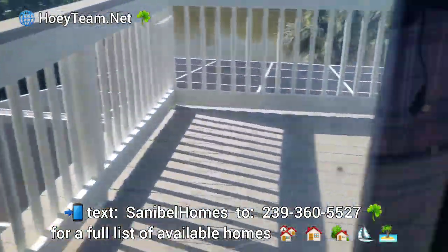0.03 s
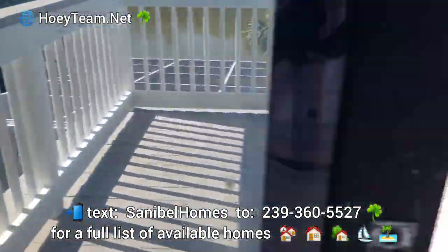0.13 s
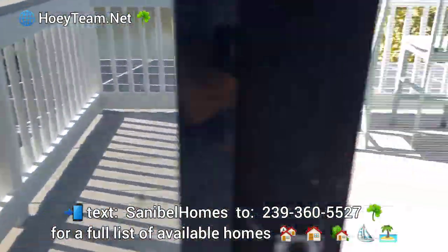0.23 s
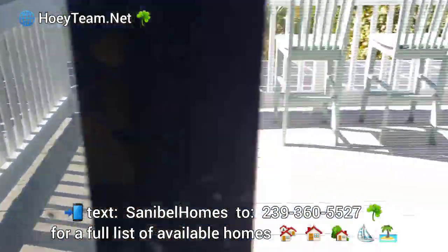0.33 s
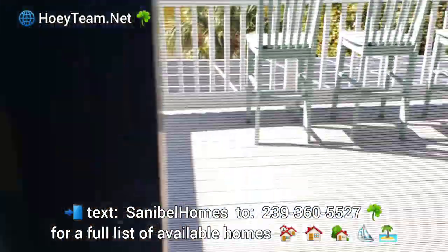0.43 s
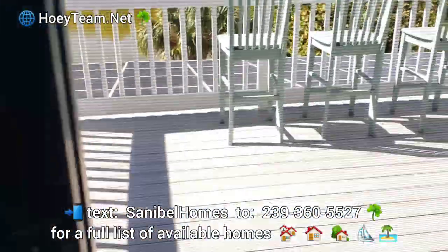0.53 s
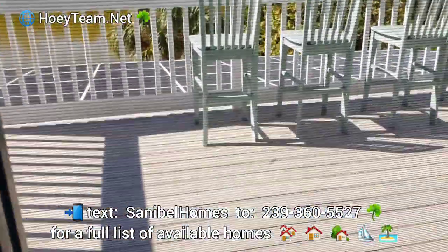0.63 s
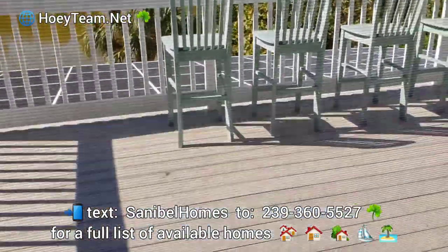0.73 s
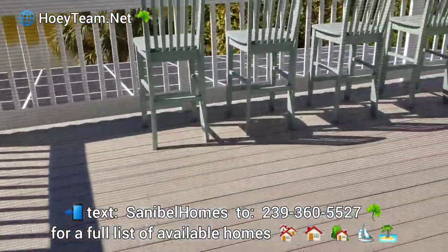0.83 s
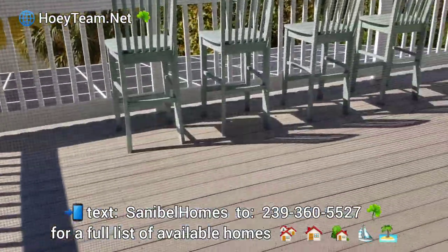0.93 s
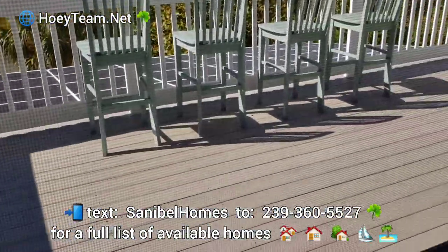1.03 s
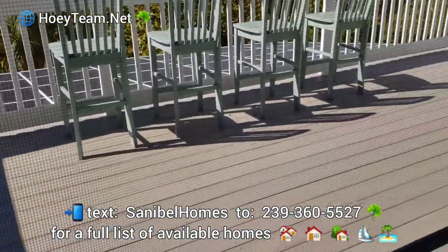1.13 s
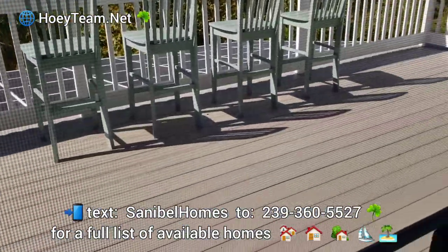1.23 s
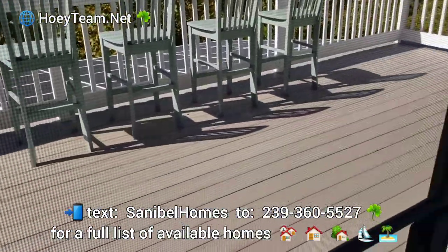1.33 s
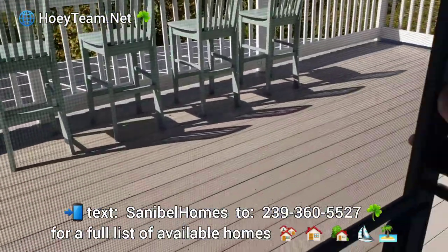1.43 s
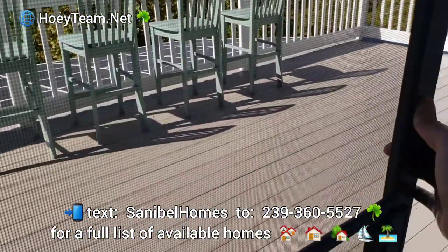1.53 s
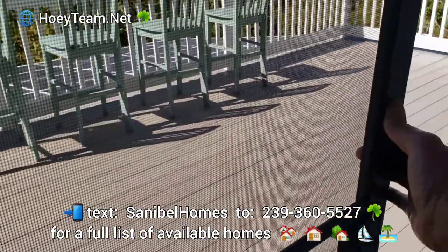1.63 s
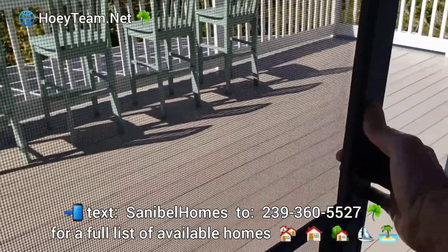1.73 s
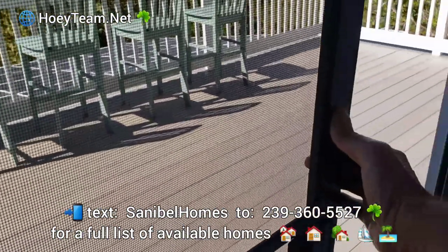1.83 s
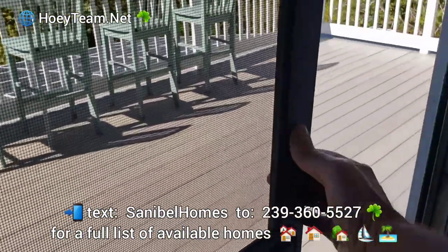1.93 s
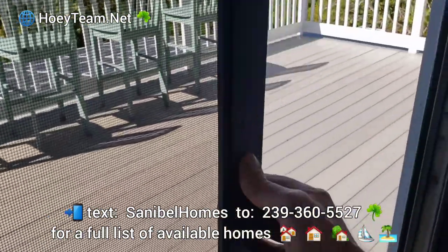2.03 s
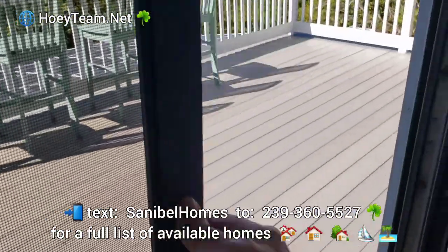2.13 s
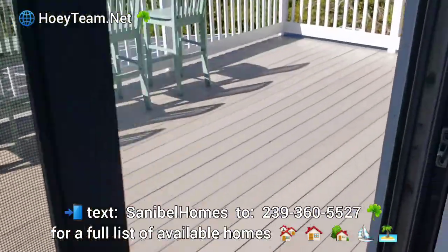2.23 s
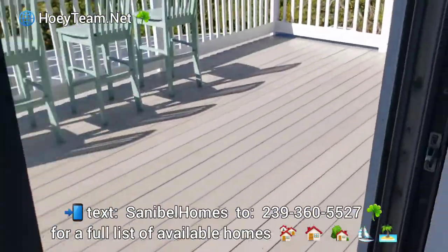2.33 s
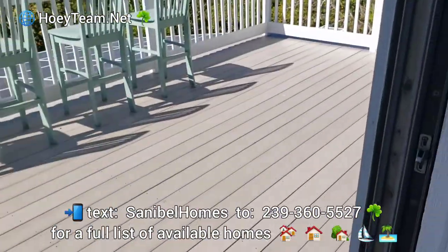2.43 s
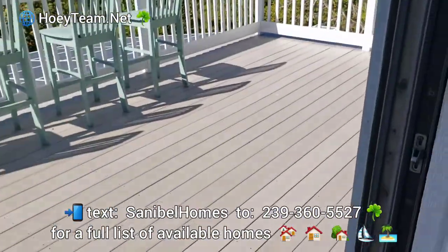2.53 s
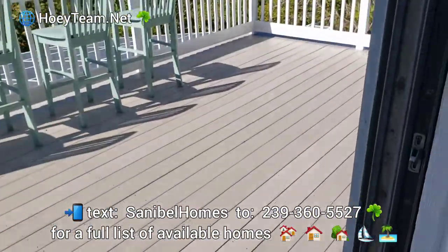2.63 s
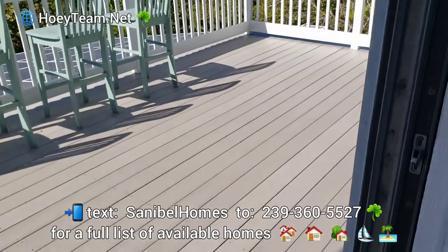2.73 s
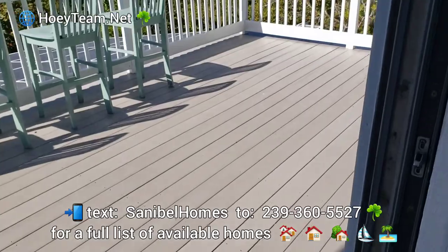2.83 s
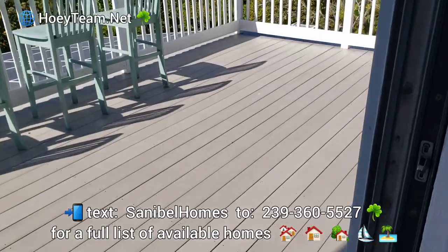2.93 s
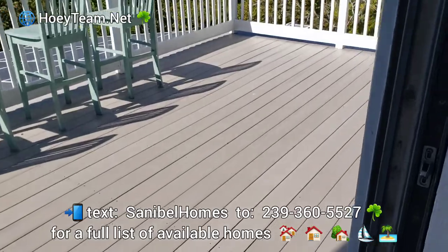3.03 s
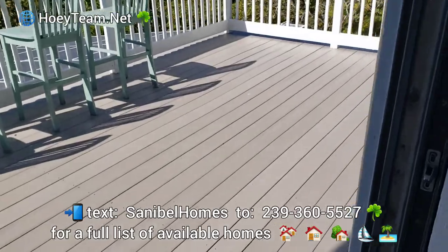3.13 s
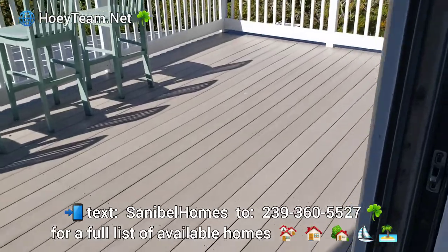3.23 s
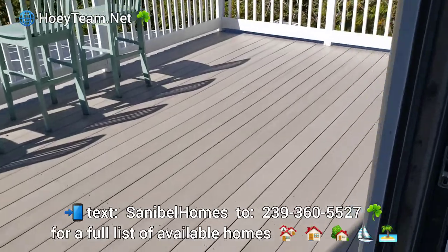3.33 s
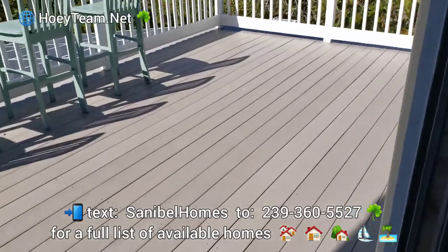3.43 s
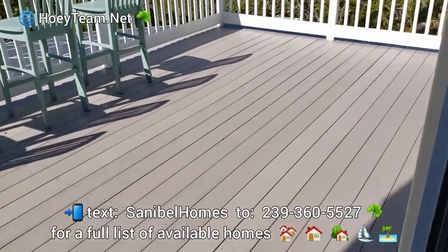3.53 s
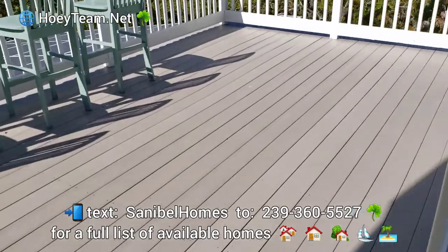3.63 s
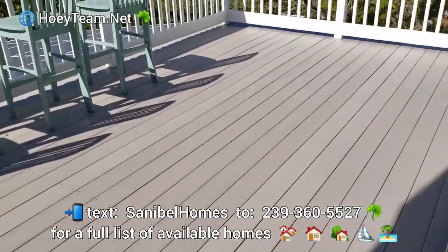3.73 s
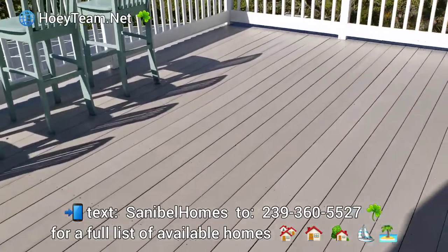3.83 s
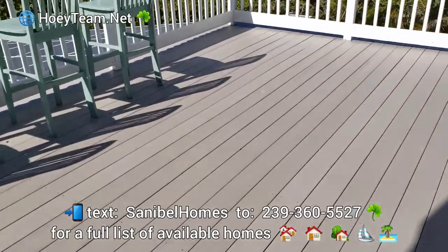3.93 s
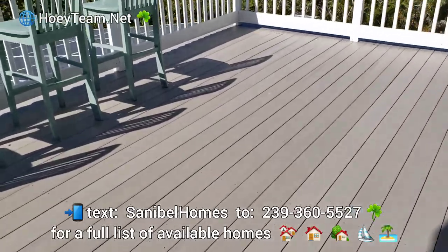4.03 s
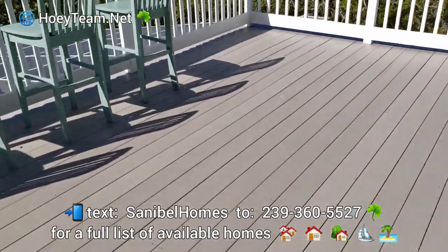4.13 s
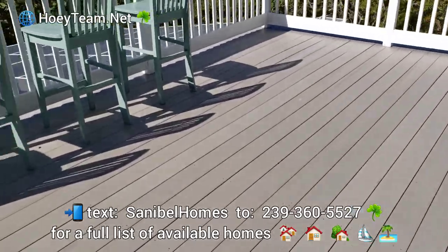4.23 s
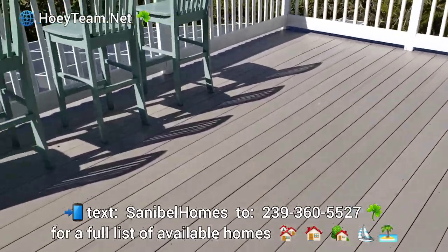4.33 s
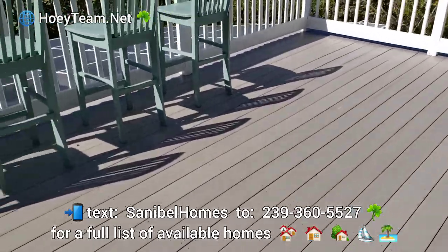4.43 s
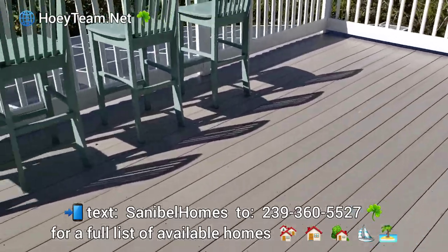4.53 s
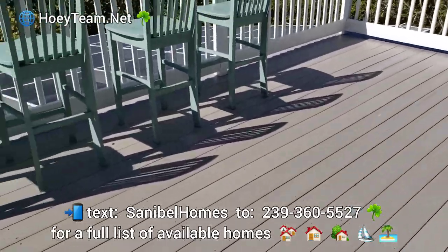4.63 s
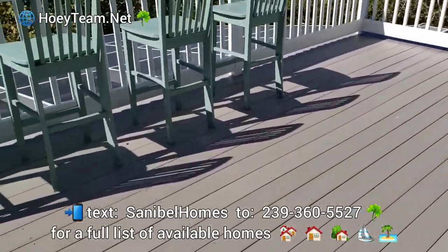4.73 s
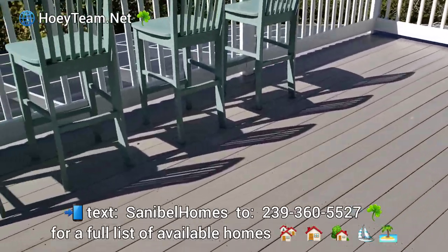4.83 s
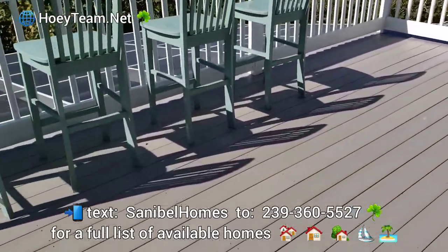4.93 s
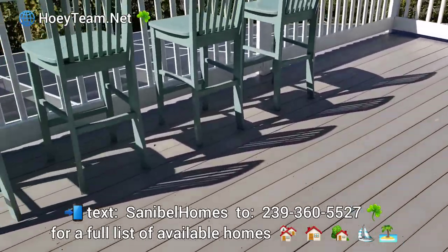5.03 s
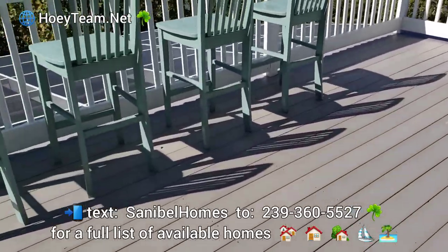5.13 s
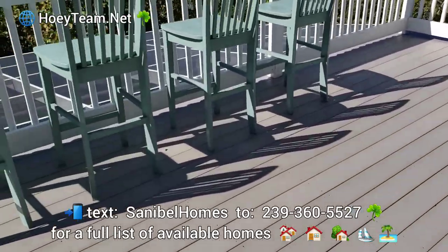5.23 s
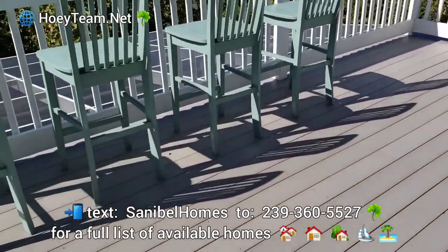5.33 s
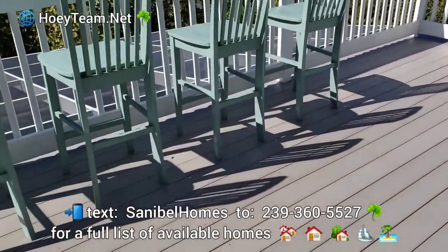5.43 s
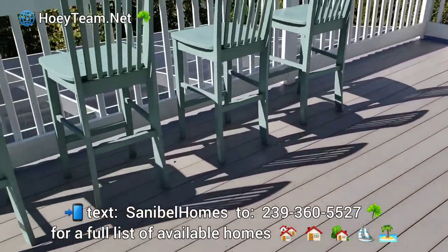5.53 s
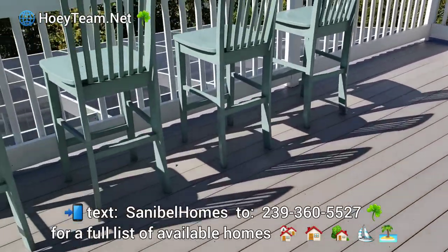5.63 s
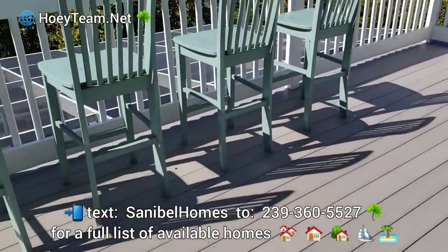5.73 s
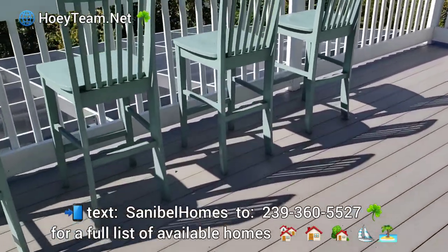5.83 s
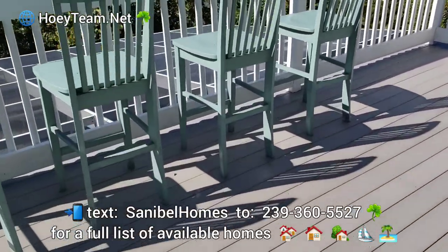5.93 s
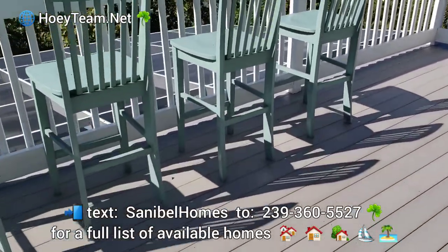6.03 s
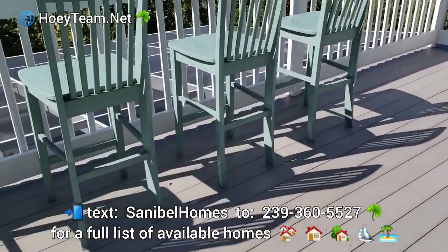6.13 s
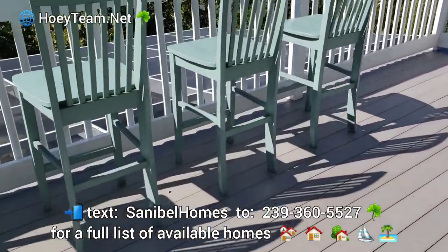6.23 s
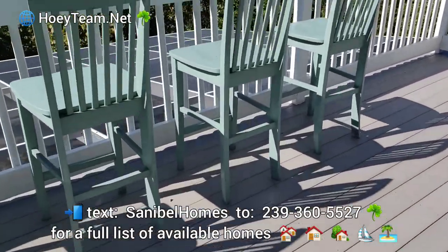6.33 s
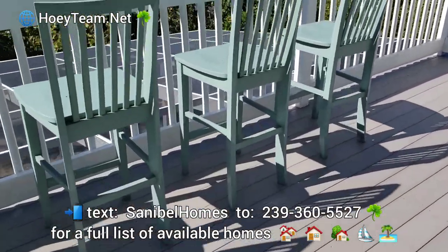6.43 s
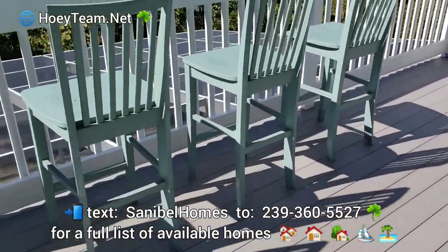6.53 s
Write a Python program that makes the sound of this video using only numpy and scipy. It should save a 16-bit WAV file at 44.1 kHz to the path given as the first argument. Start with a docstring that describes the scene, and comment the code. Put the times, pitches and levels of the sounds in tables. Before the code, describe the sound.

Close, dry scuffs and fingers rubbing a handle lead into a heavy glass door rumbling along its metal track. A lighter, brighter screen door follows, rattling and ending with small metallic chirps. Soft, hollow footfalls step onto the deck, then one loud, sharp knock rings briefly with short room reflections. A few more steps follow over faint low rumble and distant air. Handheld stereo microphone, close to the doorway.

```python
"""Sliding glass door and screen.

A glass door, then its screen, roll along a gritty aluminium track: dense random impacts through body colours.
Cloth, fingers and brush seals rub as slip noise; the rail rings briefly where a wheel catches.
Footfalls push on a hollow deck's modes; a frame knocks sharply as ringing modes, and the room answers.
Low rumble of place, lingering pane and trodden deck lies below, with faint distant air: both shaped noise."""
import sys
import numpy as np
from scipy import signal
from scipy.fft import rfft, irfft, next_fast_len
from scipy.io import wavfile
from scipy.ndimage import map_coordinates

SR = 44100
rng = np.random.default_rng(int(sys.argv[2]) if len(sys.argv) > 2 else 0)


def dump(signal):
    """Clip the signal to [-1, 1] and save it as 16-bit WAV at the path in sys.argv[1]."""
    limited = np.clip(np.atleast_2d(signal).T, -1, 1)
    pcm = np.round(limited * 32767).astype(np.int16)
    wavfile.write(sys.argv[1], SR, pcm)


N = 289957

# likeness of the two channels: freq_hz, correlation
CHANNEL_CORRELATION = [(100, 0.95), (280, 0.84), (550, 0.81), (1000, 0), (3000, 0.0064), (15000, 0.13)]


def amp(db):
    """Decibels to gain."""
    return 10 ** (np.asarray(db) / 20)


def unit(x):
    """Scale to rms 1."""
    return x / np.sqrt(np.mean(x ** 2) + 1e-20)


def along(points, hz):
    """Join (Hz, value) points on a log frequency axis."""
    f, v = np.transpose(points)
    return np.interp(np.log(hz + 1), np.log(np.sort(f) + 1), v)


def curves(rows):
    """One level per sample for each dB column; -120 dB outside the rows."""
    s, *cols = np.transpose(rows)
    return [np.interp(np.arange(N) / SR, s, c, left=-120, right=-120) for c in cols]


def wobble(knots_per_s):
    """Smooth random curve through normally distributed knots."""
    knots = rng.standard_normal(N // 20)
    return map_coordinates(knots, [np.arange(N) * knots_per_s / SR], mode="wrap")


def fade(t, t60):
    """Exponential decay, 60 dB in t60."""
    return np.exp(-np.log(1000) * t / t60)


def filtered(x, response):
    """Multiply the spectrum of x by a response of frequency."""
    size = x.shape[-1]
    m = next_fast_len(size + SR // 4)
    return irfft(rfft(x, m) * response(np.fft.rfftfreq(m, 1 / SR)), m)[..., :size]


def channel_angle(hz):
    """Angle whose cosine is the left-right correlation."""
    return np.arccos(np.clip(along(CHANNEL_CORRELATION, hz), -1, 1))


def spread(pair, response):
    """Colour two unrelated signals and mix them to stereo of rms 1: bass shared, treble apart."""
    def mid_side_response(hz):
        turn = channel_angle(hz) / 2
        return response(hz) * np.array([np.cos(turn), np.sin(turn)])

    mid, side = filtered(pair, mid_side_response)
    return unit(np.array([mid + side, mid - side]))


def noise(colour, size):
    """Stereo noise with a given spectrum, rms 1."""
    return spread(rng.standard_normal((2, size)), lambda hz: amp(along(colour, hz)))


def add(track, start_s, sound):
    """Mix a sound into the track."""
    part = track[:, round(start_s * SR):][:, :sound.shape[-1]]
    part += sound[..., :part.shape[-1]]


def tail(colour):
    """One second of room answer; the treble dies first."""
    # freq_hz, t60_s
    room_decay = [(80, 1), (250, 0.46), (1000, 0.36), (3000, 0.35), (8000, 0.27), (15000, 0.21)]
    hz, t, z = signal.stft(noise(colour, size=SR), SR, nperseg=256)
    decaying = z * fade(t, along(room_decay, hz)[:, None])
    return signal.istft(decaying, SR, nperseg=256)[1][:, :SR]


def bumps(rate_per_s, ring_t60_s, tick):
    """Random tiny impacts: each is a bare tick and a short diffuse ring of its own."""
    sizes = amp(4.5 * np.clip(rng.standard_normal(N), -2, 2))
    hits = (rng.random(N) < rate_per_s / SR) * sizes / np.sqrt(rate_per_s)
    keep = fade(1 / SR, ring_t60_s) ** 2  # share of the ringing energy left after one sample
    power = signal.lfilter([1 - keep], [1, -keep], hits ** 2)
    return np.sqrt(power + (tick * hits) ** 2) * rng.standard_normal((2, N))


def rasp(length_s, centre_hz):
    """A sudden short noise burst with a faint slower tail."""
    # multiple of the centre, level_db (per Hz)
    burst_shape = [(.1, -19), (.33, -15.5), (.65, -4.5), (1, 7.5), (1.45, -3), (3, -19), (8, -40)]
    t = np.arange(SR // 5) / SR
    onset = 1 - np.exp(-t / (.03 * length_s))
    decay = fade(t, 1.2 * length_s) + amp(-24) * fade(t, 6 * length_s)
    colour = [(centre_hz * k, level_db) for k, level_db in burst_shape]
    return amp(2.5) * onset * decay * noise(colour, size=len(t))


def outdoors():
    """Low rumble of place, lingering pane and trodden deck, with faint distant air, as wavering noise."""
    # time_s, level_db
    rumble_level = [(0, -57), (0.45, -63.5), (1.2, -48.5), (1.6, -55), (2.7, -52), (3.4, -57),
                    (3.95, -54.5), (4.3, -59), (5.2, -60), (5.85, -66.5), (6.3, -51), (6.6, -62)]
    # freq_hz, level_db (per Hz)
    rumble_colour = [(22, -29), (45, 4), (70, 4), (130, 1), (220, -3.5), (330, -13), (700, -46.5)]
    air_colour = [(150, 4.5), (350, 1.5), (700, 1), (1020, 1), (1350, -5.5), (2500, -10.5), (5000, -22),
                  (9000, -31)]
    air_db = -68
    low = noise(rumble_colour, size=N) * amp(curves(rumble_level)[0] + 1.2 * wobble(14))
    return low + noise(air_colour, size=N) * amp(air_db + 0.77 * wobble(4.5))


def scuffs():
    """Dry scuffs and small ticks close by, now and then."""
    # start_s, level_db, length_s, centre_hz
    scuff_events = [(0.034, -33.5, 0.057, 11900), (0.168, -29.5, 0.0091, 11400),
                    (0.202, -24.5, 0.018, 11400), (0.212, -27, 0.024, 11200), (0.25, -29.5, 0.023, 11800),
                    (0.352, -45.5, 0.024, 1140), (0.432, -28, 0.027, 10760), (0.489, -25.5, 0.025, 10400),
                    (0.7515, -24, 0.023, 10000), (0.815, -27, 0.038, 10000), (1.476, -65, 0.077, 4680),
                    (1.894, -32, 0.034, 8700), (2.057, -30, 0.038, 10400), (3.006, -47, 0.14, 1750),
                    (3.12, -52, 0.024, 9900), (3.88, -59.5, 0.064, 1160), (3.881, -57, .015, 10740),
                    (4.016, -69.5, 0.042, 4700), (4.878, -67, 0.034, 450), (4.949, -51, 0.04, 477),
                    (4.986, -55.5, 0.053, 700), (6.411, -55, .02, 7900), (6.456, -39.5, 0.006, 11470)]
    out = np.zeros((2, N))
    for start_s, level_db, length_s, centre_hz in scuff_events:
        add(out, start_s, amp(level_db) * rasp(length_s, centre_hz))
    return out


def creak(start_s, hz, level_db):
    """A loaded deck board gives one soft, short creak on two close modes."""
    out, t = np.zeros((2, N)), np.arange(SR // 4) / SR
    ring = np.sin(2 * np.pi * hz * t) + .5 * np.sin(2 * np.pi * 1.12 * hz * t)
    add(out, start_s, amp(level_db) * ring * (1 - np.exp(-t / .004)) * fade(t, 0.11))
    return out


def tread(push_hz):
    """One push on the boards rings mostly the deck modes near its own period."""
    # freq_hz, level_db, t60_s
    deck_modes = [(70.9, -7, 0.38), (96.7, 1.5, 0.076), (159.8, -5.5, 0.12), (214, -13, 0.13),
                  (298, -18.5, 0.21), (430, -22.5, 0.47)]
    t = np.arange(SR // 2) / SR
    push = np.sin(2 * np.pi * push_hz * t) * fade(t * push_hz, 5.8)  # decay counted in cycles
    boards = np.zeros(len(t))
    for hz, level_db, t60_s in deck_modes:
        coupling = 1 / (1 + np.log2(hz / push_hz) ** 2)
        boards += amp(level_db) * coupling * np.sin(2 * np.pi * hz * t) * fade(t, t60_s)
    onset = 1 - np.exp(-(t * push_hz / 0.59) ** 2)
    return onset * (amp(5.0) * push + boards)


def steps():
    """Each foot rolls from heel to ball in three ever slower pushes; a harder heel thuds and scrapes more."""
    # footfalls on sill and deck: start_s, heel_push_hz, heel_to_ball_s, heel_db, midfoot_db, ball_db
    footfalls = [(2.909, 199, .02, -36.5, -48, -50), (3, 207, 0.025, -35, -40, -27.5),
                 (3.684, 210, .039, -25, -30, -31.5), (3.796, 129.5, 0.026, -38.5, -53.5, -54),
                 (3.881, 174, 0.029, -39, -46, -53), (4.877, 140, 0.0275, -21.5, -28, -31.5),
                 (6.037, 235, .053, -23, -23, -23), (6.238, 195, 0.038, -37.5, -42, -35.5),
                 (6.424, 85, 0.027, -43, -58, -40)]
    # freq_hz, level_db (per Hz)
    sole_colour = [(40, -10), (90, 5.5), (250, -2.5), (450, -11.5), (900, -22), (2000, -42), (6000, -49.5)]
    ball_pitch = 0.56  # ball push frequency / heel push frequency
    thud_db, thud_rise_s = -15, 0.0053  # diffuse thud of the whole deck
    scrape_db, scrape_s, scrape_hz, hard_heel_hz = -28.5, 0.0756, 633, 219
    out, t = np.zeros((2, N)), np.arange(SR) / SR
    for start_s, heel_hz, roll_s, heel_db, midfoot_db, ball_db in footfalls:
        for part, level_db in [(0, heel_db), (.5, midfoot_db), (1, ball_db)]:
            add(out, start_s + part * roll_s, amp(level_db) * tread(heel_hz * ball_pitch ** part))
        hardness = heel_hz / hard_heel_hz
        thud = tail(sole_colour) * (1 - np.exp(-(t / thud_rise_s) ** 2))
        add(out, start_s, amp(heel_db + thud_db) * hardness * thud)
        add(out, start_s, amp(heel_db + scrape_db) * hardness ** 4 * rasp(scrape_s, scrape_hz))
    # keep the deepest bass out of the footfalls
    return signal.sosfilt(signal.butter(2, 52, "high", fs=SR, output="sos"), out)


def knock():
    """The frame hits its stop: quick hard contacts, the ring of frame and pane, then the room."""
    # frame landing, then latch rattle: start_s, level_db
    contacts = [(5.3058, -22.5), (5.3142, -33), (5.3197, -28.5)]
    # freq_hz, level_db, t60_s
    frame_modes = [(159.7, -35, 0.17), (219.4, -26.5, 0.2), (287, -33, .33), (380.4, -19, 0.25),
                   (380, -28, 0.12), (417, -37, 0.35), (506, -46, 0.55), (788, -44.5, 0.46),
                   (790, -53, 0.23), (920, -34, 0.15), (1050, -37, 0.18), (1193, -29, 0.13),
                   (1350, -58, 0.2), (1620, -39, 0.27), (2086, -34, 0.18), (2235, -29, 0.16),
                   (2670, -37, 0.15), (2670, -38, 0.18), (2990, -35, 0.15), (3380, -34, 0.18),
                   (3440, -42.5, 0.3), (4030, -46, 0.24), (5405, -38, 0.17)]
    # freq_hz, level_db (per Hz)
    knock_colour = [(30, -26), (60, -3.5), (130, -3), (300, 0), (450, 2), (600, -6), (1100, -5.5),
                    (1550, -12.5), (2700, -9.5), (3700, -15.5), (8000, -16), (12000, -13.5), (15800, -17)]
    out, t = np.zeros((2, N)), np.arange(SR) / SR
    for start_s, level_db in contacts:
        crack = noise(knock_colour, size=SR) * fade(t, 0.071) * amp(0.5)
        answer = amp(-5.5) * tail(knock_colour)
        add(out, start_s, amp(level_db) * (1 - np.exp(-t / 0.00024)) * (crack + answer))
    for hz, level_db, t60_s in frame_modes:
        apart = channel_angle(hz) * rng.choice([-.5, .5]) * np.array([[1], [-1]])
        ring = np.sin(2 * np.pi * hz * t + apart) * fade(t, t60_s)
        add(out, contacts[0][0], amp(level_db) * ring * (1 - np.exp(-t / 0.017)))
    u = t / 0.00056
    add(out, 5.308, -amp(-12.0) * (1 - u) * np.exp(-u))  # the pane's single hard push on the air
    return out


def slips(colour):
    """Fibres or skin catch and slip: dense tiny impacts with a fluttering level."""
    hiss = spread(bumps(3900, ring_t60_s=0.048, tick=0.067), lambda hz: amp(along(colour, hz)))
    return hiss * amp(wobble(35))


def rubbing(glass_speed_db, screen_speed_db, glass_seal_db, screen_seal_db):
    """Fibres of sleeve and brush seals slip in a fine hiss; fingers on the handle slide more dully."""
    # slow sleeve strokes: peak_s, level_db, rise_s, fall_s (e-folding times)
    strokes = [(0.09, -35, 0.053, 0.089), (0.23, -38.5, .03, .05), (0.47, -37, .04, .06),
               (0.771, -42, .06, .07), (1.33, -64.5, 0.13, 0.13), (1.43, -53.5, 0.023, 0.051),
               (1.515, -55, 0.025, 0.12), (2.85, -60.5, 0.026, .09), (3.07, -48.5, 0.032, 0.04),
               (3.31, -57.5, 0.1, 0.19), (3.722, -54, 0.033, .055), (5.1, -68, .15, 0.22),
               (5.549, -67, 0.17, 0.64), (6.36, -62.5, 0.19, .35)]
    # fingers on the handle: time_s, level_db
    grip_level = [(0, -60.5), (0.04, -54), (0.25, -54.5), (0.33, -56.5), (0.42, -55), (0.5, -70.5)]
    # freq_hz, level_db (per Hz)
    fibre_colour = [(1500, -29), (3200, -18), (5000, -14.5), (7500, -15), (9200, -4.5), (11500, -3),
                    (15500, -5)]
    grip_colour = [(60, -11), (150, -5), (215, 6), (310, -4), (650, -8.5), (850, -6.5), (1020, 5.5),
                   (1350, -14.5), (1900, -10), (3200, -17), (6000, -15), (10000, -36)]
    cloth_db = -75  # clothes never lie quite still
    seal_growth = 1  # dB per dB of speed
    t = np.arange(N) / SR
    power = amp(cloth_db) ** 2
    for peak_s, level_db, rise_s, fall_s in strokes:
        shape = np.exp(np.minimum((t - peak_s) / rise_s, (peak_s - t) / fall_s))
        power = power + (amp(level_db) * shape) ** 2
    for seal_db, speed_db in [(glass_seal_db, glass_speed_db), (screen_seal_db, screen_speed_db)]:
        power = power + amp(seal_db + seal_growth * speed_db) ** 2
    return np.sqrt(power) * slips(fibre_colour) + amp(curves(grip_level)[0]) * slips(grip_colour)


def chirps():
    """A wheel catches and the rail rings briefly: decaying sines, phase-shifted between channels."""
    # start_s, level_db (before a common lift), pitch_hz, t60_s
    catches = [(1.064, -40, 3560, 0.058), (1.922, -32, 4070, 0.038), (2.382, -30, 5580, 0.028),
               (2.4495, -22.5, 4200, 0.015), (2.4608, -10.5, 4100, 0.0081), (2.505, -36.5, 4510, 0.054)]
    out, t = np.zeros((2, N)), np.arange(SR // 8) / SR
    for start_s, level_db, pitch_hz, t60_s in catches:
        phase = 2 * np.pi * pitch_hz * t + np.array([[0], [.9]])
        onset = 1 - np.exp(-(t / 0.0014) ** 2)
        add(out, start_s, amp(level_db + 5) * np.sin(phase) * fade(t, t60_s) * onset)
    return out


def doorway(x):
    """Close reflections from glass, jamb and floor ripple the spectrum above 540 Hz."""
    t = np.arange(SR // 6) / SR
    echoes = filtered(rng.standard_normal((2, len(t))) * fade(t, .11), lambda hz: hz > 540)
    wet = signal.fftconvolve(x, echoes / np.linalg.norm(echoes[0]), axes=1)[:, :N]
    return x + .5 * wet


def door_speed(*pushes):
    """Speed in dB through a door's pushes, briefly lifted where wheels jolt over rail flaws."""
    # peak_s, lift_db
    jolts = [(0.492, 2.5), (0.876, 2), (1.007, 3.5), (1.691, 4.5), (1.898, 0.5), (2.095, 1), (2.46, 3.5),
             (2.926, 6.5), (3.012, 4.5)]
    jolt_width_s = 0.039
    t = np.arange(N) / SR
    speed_db = np.max([curves(push)[0] for push in pushes], axis=0)
    return speed_db + sum(lift_db / (1 + ((t - s) / jolt_width_s) ** 2) ** 2 for s, lift_db in jolts)


def roll(speed_db, colour, peaks, rumble_db, rattle_db, grit_db):
    """Wheels run over track bumps and sand: the faster they run, the denser, louder and brighter the impacts."""
    rumble_growth, grit_growth = 0.74, 1.028  # dB per dB of speed
    judder_db, judder_per_s = 0.13, 35
    density = .5 + amp(speed_db / 2)
    judder = judder_db * wobble(judder_per_s)  # uneven wheels shake all parts of the door together

    def body(hz):
        lift_db = sum(db / (1 + (2 * (hz - f) / width) ** 2) for f, width, db in peaks)
        return amp(along(colour, hz) + lift_db)

    def below(hz, edge_hz):
        return 1 / (1 + (hz / edge_hz) ** 8)

    def part(impacts, low_hz, high_hz):
        def band(hz):
            return body(hz) * np.sqrt(np.abs(below(hz, high_hz) - below(hz, low_hz)))
        return spread(impacts, band)

    pane = part(bumps(1100 * density, ring_t60_s=0.04, tick=0.31), 45, 300)
    frame = part(bumps(1100 * density, ring_t60_s=0.04, tick=.5), 300, 1500)
    sand = part(bumps(1300 * density, ring_t60_s=.024, tick=.3), 1500, SR)
    mix = pane * amp(rumble_db + rumble_growth * speed_db)
    mix += frame * amp(rattle_db + speed_db)
    mix += sand * amp(grit_db + grit_growth * speed_db)
    return amp(judder) * mix


def scene():
    """Both doors, the person, the low rumble and the open air."""
    # what each door radiates: freq_hz, level_db (per Hz)
    glass_colour = [(22, -22), (45, -4.5), (110, 1), (200, -0.5), (320, -9.5), (520, -11), (900, -11),
                    (1500, -18.5), (2500, -20.5), (3700, -23), (5500, -21.5), (7200, -30), (10000, -29),
                    (15000, -46)]
    screen_colour = [(22, -28.5), (45, -5.5), (110, 4.5), (170, 3), (320, -4.5), (650, -7), (950, -6.5),
                     (1400, -16), (2500, -13.5), (4500, -17.5), (7200, -25.5), (10000, -28.5), (15000, -37)]
    # panel and rail resonances: freq_hz, width_hz, lift_db
    glass_peaks = [(128.3, 25, 0.5), (233, 19, -2.5), (379, 29, 7.5), (500, 32, 13), (562, 66, 2.5),
                   (770, 60, 1), (1080, 140, 2.5), (2750, 290, 3.5), (5300, 820, 3)]
    screen_peaks = [(161, 4.7, 1.7), (267, 21, 4.8), (370, 16, 6.9), (510, 13, 3), (680, 50, 1.9),
                    (886, 140, 3.1), (983, 22, 1.6), (1448, 62, 7.1), (1710, 170, 6.1), (4100, 550, 2.3),
                    (5040, 1100, 5)]
    # glass pushed open and coasting to rest; screen following, then nudged on: time_s, speed_db (re full)
    glass_push = [(0.41, -31), (0.485, -14.5), (0.56, -8), (0.79, -1), (1.02, -3), (1.15, -11), (1.26, -32),
                  (1.4, -56)]
    screen_push = [(1.6, -37), (1.72, -17), (1.88, -4), (2.12, 1), (2.36, -3.5), (2.53, -8.5),
                   (2.62, -24.5), (2.79, -40)]
    screen_nudge = [(2.78, -36.5), (2.93, -21), (3.06, -19.5), (3.201, -42)]
    glass_speed_db, screen_speed_db = door_speed(glass_push), door_speed(screen_push, screen_nudge)
    glass = roll(glass_speed_db, glass_colour, glass_peaks, rumble_db=-34, rattle_db=-33.0, grit_db=-39)
    screen = roll(screen_speed_db, screen_colour, screen_peaks, rumble_db=-33.0, rattle_db=-30.5, grit_db=-36)
    fibres = rubbing(glass_speed_db, screen_speed_db, glass_seal_db=-44.5, screen_seal_db=-41)
    to_right = amp([[-.7], [.7]])  # the working arm is on the right
    doors = doorway(glass + fibres * to_right) + doorway(screen) + chirps()
    person = scuffs() * to_right + steps() + creak(start_s=4.311, hz=497, level_db=-50.0)
    return doors + person + knock() + outdoors()


def record(dry):
    """Left and right microphones differ in tone; nothing passes the band limit."""
    # freq_hz, left_minus_right_db
    channel_lean = [(60, 2), (300, 2.5), (550, 2.5), (1200, 5), (2500, 4), (4500, 1.5), (8000, 4.5),
                    (11000, -4), (15000, -7.5)]
    top_hz = 15900

    def microphones(hz):
        lean_db = along(channel_lean, hz) * np.array([[.5], [-.5]])
        return amp(lean_db) * (hz < top_hz)

    return filtered(dry, microphones)


dry = scene()
out = record(dry)
dump(out)
```